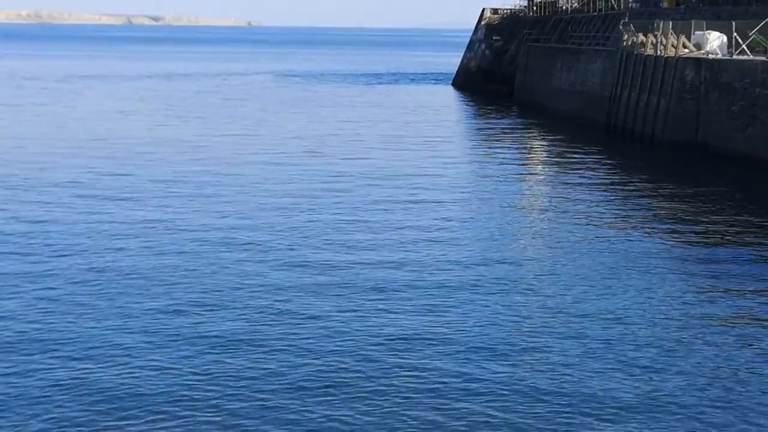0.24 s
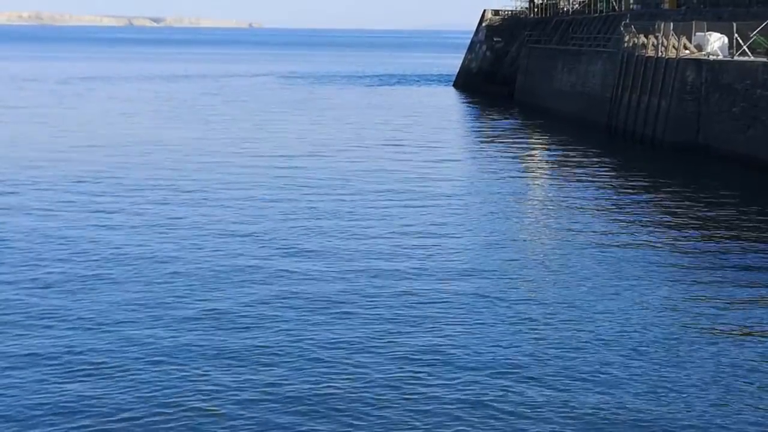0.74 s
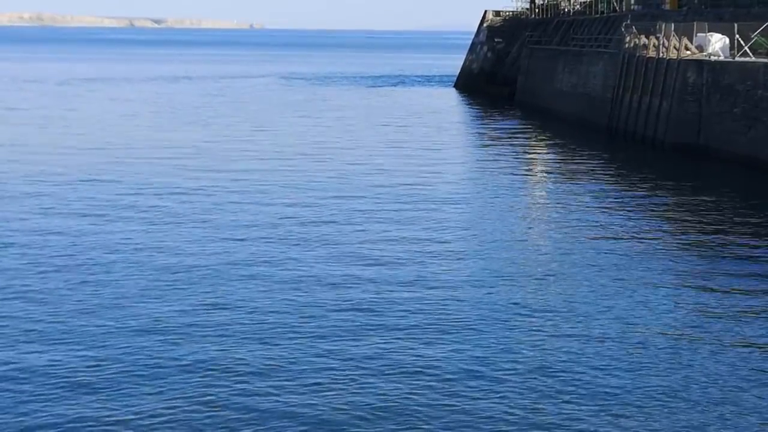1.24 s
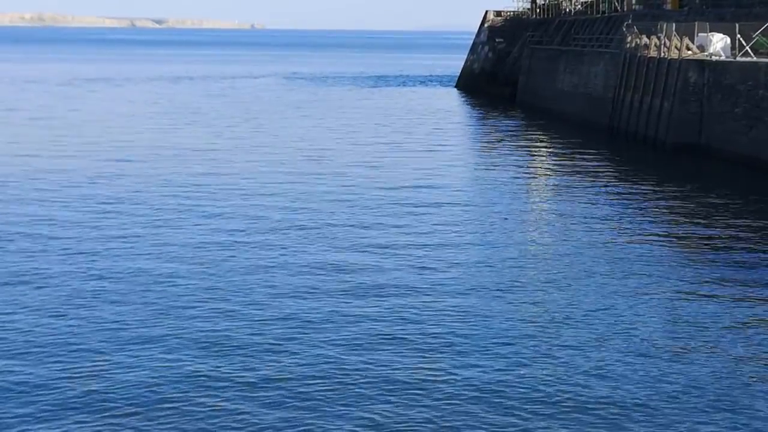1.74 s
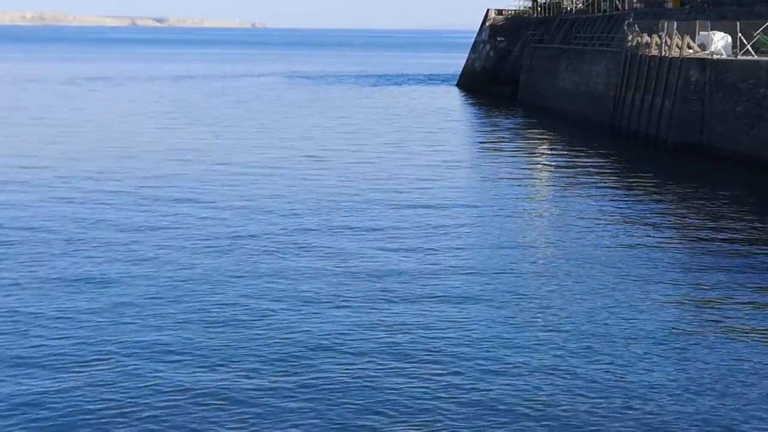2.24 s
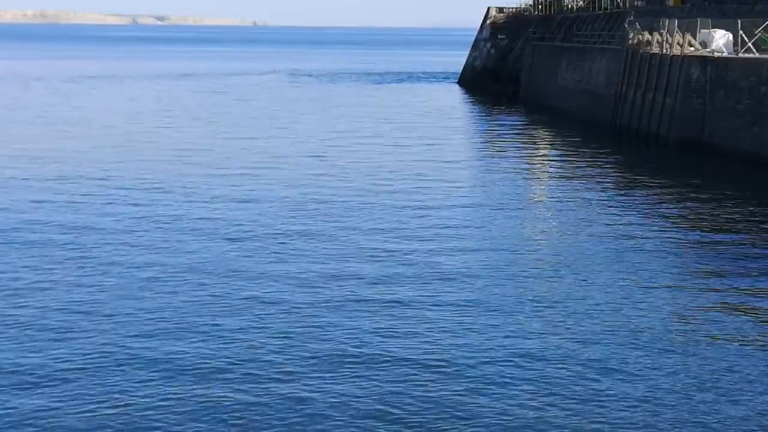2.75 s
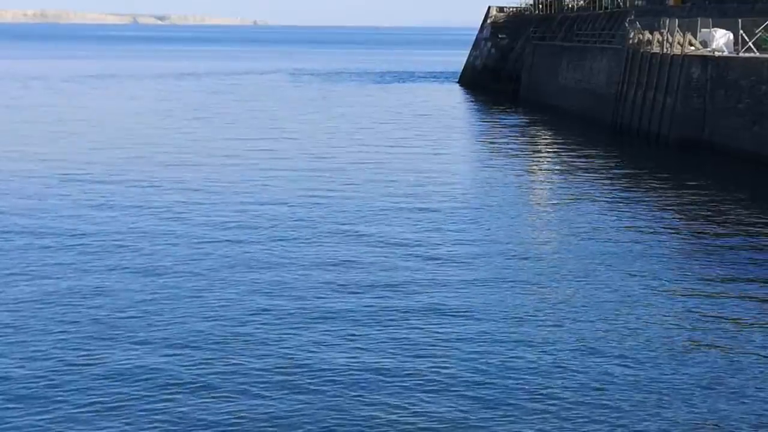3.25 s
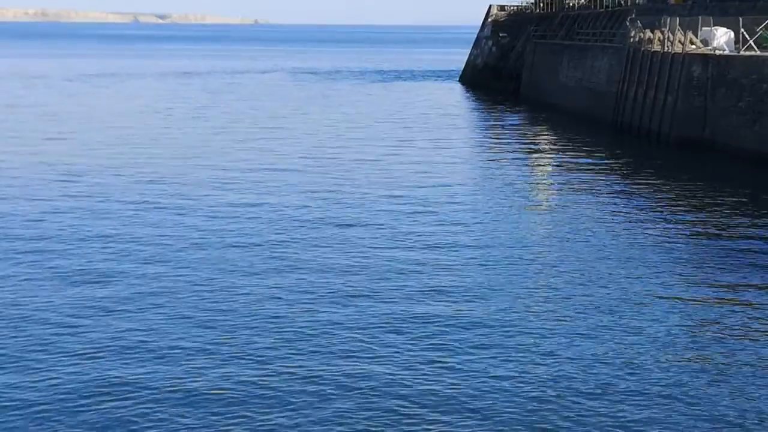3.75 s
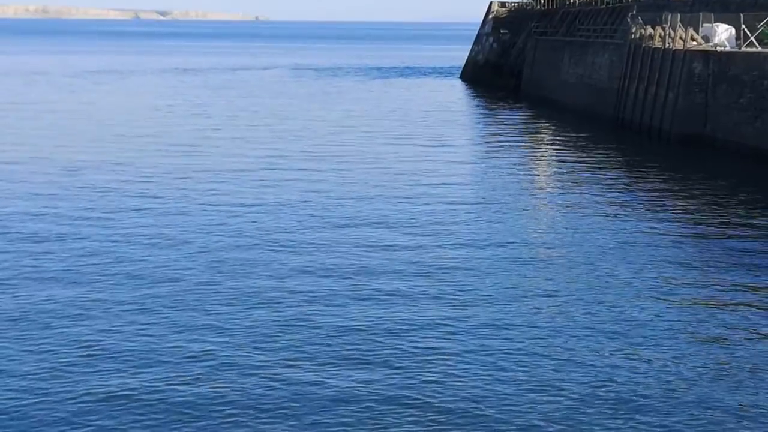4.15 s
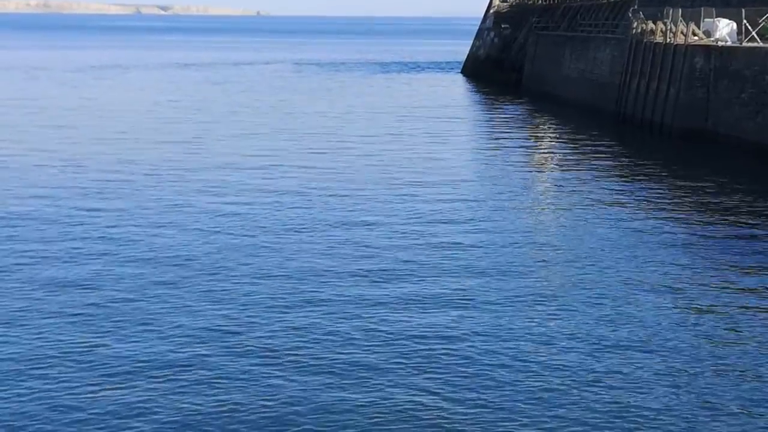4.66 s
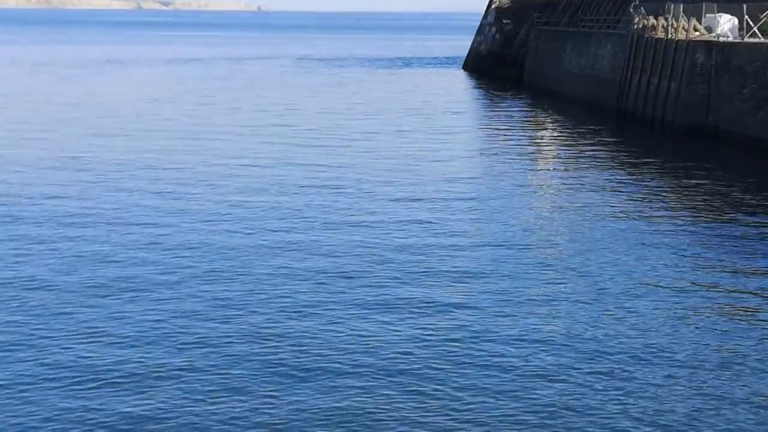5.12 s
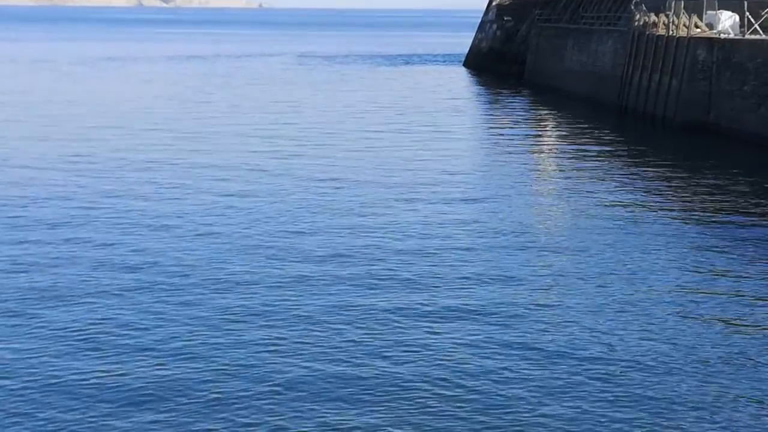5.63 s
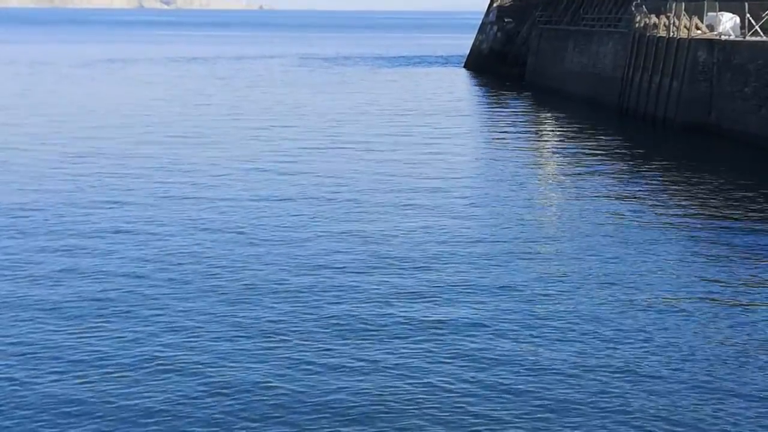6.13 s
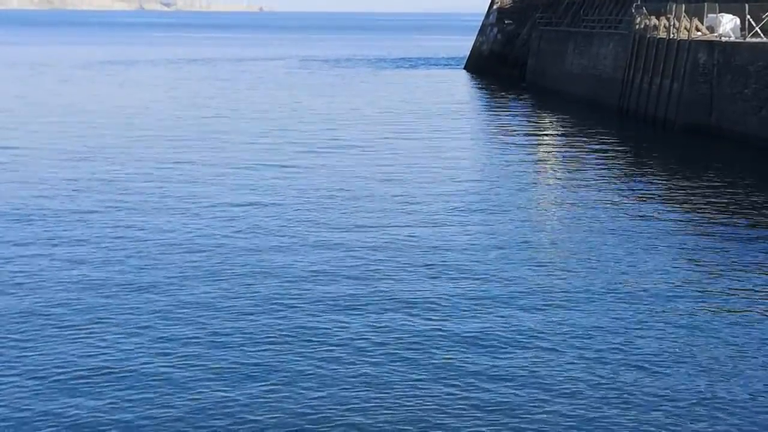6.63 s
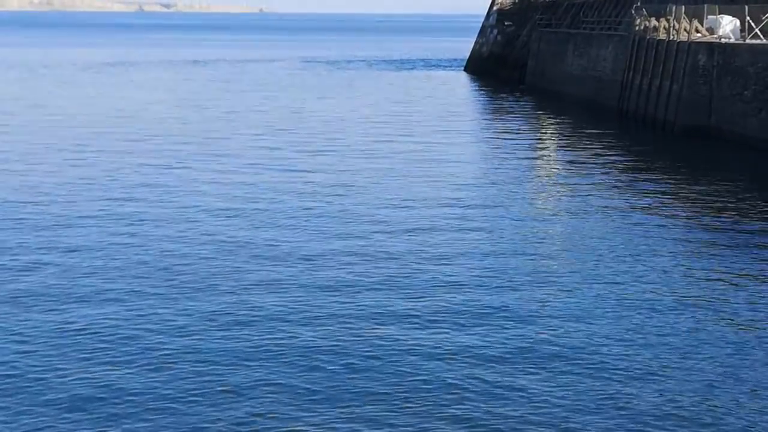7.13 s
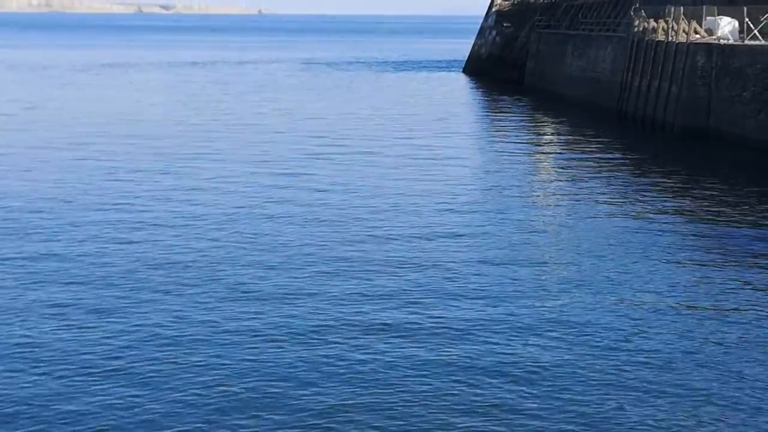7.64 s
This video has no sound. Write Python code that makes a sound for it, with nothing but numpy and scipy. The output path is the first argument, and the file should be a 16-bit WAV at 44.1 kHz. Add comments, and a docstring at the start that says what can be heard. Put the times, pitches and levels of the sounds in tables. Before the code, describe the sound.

Calm sea water laps at a stone harbour wall, with a sharp slap, hollow plops and fine foam fizz in the first second, then quiet trickling and single drops. A small bird twitters thinly around three seconds. Over a soft low breeze, wind gusts start buffeting the microphone near six seconds, thudding irregularly and growing loud while livelier wavelets splash. Open air, close stereo.

```python
"""Calm sea laps against a stone harbour wall: noise and bubble pings swell with each small wave.
Foam fizzes, single drops tick, wavelets slap the stone and large bubbles plop with a rising pitch.
Small birds twitter thinly as gliding, trilled tones that the wall throws back; far tones hum faintly.
A steady breeze of low noise rumbles on the microphone; trains of pressure dips make its gusts,
faint at first and strong near the end."""
import sys
import numpy as np
from scipy import signal
from scipy.fft import rfft, irfft
from scipy.io import wavfile
from scipy.ndimage import uniform_filter1d

SR = 44100
rng = np.random.default_rng(int(sys.argv[2]) if len(sys.argv) > 2 else 0)


def persist_wave(psi):
    """Save psi, clipped to +-1, as 16-bit WAV."""
    counts = np.round(np.clip(psi, -1, 1) * 32767).astype(np.int16)
    wavfile.write(sys.argv[1], SR, np.atleast_2d(counts).T)


N = 347772
TIME = np.arange(N) / SR


def amp(db):
    """Logarithmic level: turns decibels into an amplitude gain."""
    return 10 ** (np.asarray(db) / 20)


def evened(x):
    """Normalisation: scales to a root-mean-square of 1."""
    return x / np.sqrt(np.mean(x ** 2) + 1e-20)


def smoothed(x, size, axis=-1):
    """Low-pass smoothing: two moving averages in succession."""
    return uniform_filter1d(uniform_filter1d(x, size=size, axis=axis), size=size, axis=axis)


def read(points, hz):
    """Spectral interpolation: reads a curve along a logarithmic frequency axis."""
    f, value = np.transpose(points)
    return np.interp(np.log(hz + 1), np.log(f + 1), value)


def add(mix, start_s, sound):
    """Superposition: adds a sound to the mix from start_s on."""
    part = mix[:, round(start_s * SR):][:, :sound.shape[-1]]
    part += sound[..., :part.shape[1]]


def side_gains(pan_db):
    """Level difference: left and right gains that lie pan_db apart."""
    return amp([[pan_db / 2], [-pan_db / 2]])


def panned(sound, pan_db):
    """Equal-power panning: places a sound by level difference at constant total power."""
    return sound * evened(side_gains(pan_db))


def band_noise(size, hz, width_hz):
    """Band-limited noise: two unrelated channels under a bell-shaped spectrum."""
    f = np.fft.rfftfreq(size, 1 / SR)
    bell = np.exp(-2 * ((f - hz) / width_hz) ** 2)
    return evened(irfft(rfft(rng.standard_normal((2, size))) * bell, size))


# likeness of the two microphones; columns: frequency_hz, coherence [-1 to 1]
COHERENCE = [(40, 1), (130, 1), (290, 0.82), (640, -0.27), (1400, 0.074), (15000, -0.15)]


def paired(z, hz):
    """Spatial coherence: close microphones hear the bass alike, so mid outweighs side there."""
    same = np.clip(read(COHERENCE, hz), -1, 1)
    mid = z[0] * np.sqrt((1 + same) / 2)
    side = z[1] * np.sqrt((1 - same) / 2)
    return np.array([mid + side, mid - side])


def wall(x, t60, delay, per_s=4410, size=22050):
    """Scattered reflection: sparse random echoes off stone and water, decaying exponentially."""
    t = np.arange(size) / SR
    taps = rng.standard_normal((2, size)) * (rng.random((2, size)) < per_s / SR)
    tail = taps * amp(-60 * t / t60) * (t > delay)
    tail = tail / np.linalg.norm(tail, axis=1, keepdims=True)
    return signal.fftconvolve(x, tail, axes=1)[:, :N]


def ticks(per_s, spread_db, t60, size=500):
    """Impact noise: randomly timed broadband bursts of decaying power, as of drops on stone and water."""
    strength = amp(spread_db * np.minimum(rng.exponential(1, (2, N)), 3))
    clicks = (rng.random((2, N)) < per_s / SR) * strength
    decay = amp(-120 * np.arange(size) / SR / t60)  # of power, hence twice the 60 dB
    power = signal.oaconvolve(clicks ** 2, decay[None], axes=1)[:, :N]
    shared = power + 0.43 * power[::-1]  # each side also hears the other's drops
    return evened(np.sqrt(abs(shared)) * rng.standard_normal((2, N)))


# far hum; columns: pitch_hz, level_db
HUM = [(269, -79), (533, -101), (1077, -76.5), (1568, -81.5)]


def hum(width_hz=18):
    """Narrow-band noise: faint tones from far away, each made fuzzy by its bandwidth."""
    return sum(amp(level_db) * band_noise(N, pitch_hz, width_hz) for pitch_hz, level_db in HUM)


def eddies(colour, steadiness, crossing_s=0.00043):
    """Turbulent pressure: low, coloured noise; steadiness evens out its chance lulls."""
    hz = np.fft.rfftfreq(N, 1 / SR)
    spectrum = paired(rfft(rng.standard_normal((2, N))), hz)
    x = evened(irfft(spectrum * amp(read(colour, hz)), N))
    # eddies reach one microphone before the other, from a side that keeps changing
    drift = evened(irfft(rfft(rng.standard_normal(N)) * (hz < 6), N))
    lag = crossing_s * SR * drift
    x = np.array([x[0], np.interp(np.arange(N) + lag, np.arange(N), x[1])])
    power = smoothed((x ** 2).mean(0), size=1800)
    return evened(x / power ** (steadiness / 2))


def vortices(rate, core=0.65, uneven=.3, size_db=2, lag_turns=0.052):
    """Vortex train: cores pass at uneven intervals, each a sharp dip in pressure."""
    hz = np.fft.rfftfreq(N, 1 / SR)
    pace, strength, side = (evened(irfft(rfft(rng.standard_normal(N)) * (hz < 35), N)) for _ in range(3))
    turns = np.cumsum(rate * np.exp(uneven * pace)) / SR
    # each vortex reaches one microphone a little before the other
    turns = turns + lag_turns * side * np.array([[.5], [-.5]])
    dips = 1 / (1 + (np.sin(np.pi * turns) / core) ** 2)
    pressure = (dips.mean() - dips) * amp(size_db * strength)
    return evened(pressure - uniform_filter1d(pressure, size=3000))


# colour of the breeze; columns: frequency_hz, relative density [dB per Hz]
BREEZE = [(8.8, -44), (15, 2.5), (32, 2.5), (63, 0), (102, -5.5), (128, -14.5), (268, -16), (300, -21.5),
          (390, -39), (660, -120)]
BREEZE_DB = -52.5
# colour of the gusts' turbulence; columns: frequency_hz, relative density [dB per Hz]
BUFFET = [(10, -4.5), (25, 5), (45, 6), (65, -1), (90, -3.5), (130, -9.5), (190, -25.5), (300, -36.5),
          (600, -89), (1500, -80)]
# gusts; columns: start_s, end_s, relative level_db, typical vortex rate [per s]
GUSTS = [(0.595, 0.805, -48.5, 34), (1.02, 1.155, -52, 31), (2.737, 2.797, -52, 25.3),
         (5.806, 5.895, -44, 31.6), (6.041, 6.12, -30, 30), (6.13, 6.209, -34.5, 29),
         (6.213, 6.256, -26.5, 58), (6.261, 6.307, -32, 50), (6.365, 6.405, -29.5, 29),
         (6.471, 6.55, -36, 28.5), (6.679, 6.747, -38.5, 32.7), (6.88, 6.953, -27, 32.4),
         (6.953, 7.002, -31.5, 38.3), (7.101, 7.21, -30.5, 33), (7.219, 7.245, -32.5, 31.7),
         (7.252, 7.29, -32.5, 58), (7.312, 7.381, -33, 33), (7.384, 7.412, -27, 41),
         (7.414, 7.518, -24, 45), (7.528, 7.551, -30, 42.4), (7.568, 7.614, -26.5, 38),
         (7.701, 7.748, -25.5, 58.5), (7.765, 7.817, -28, 32.3), (7.816, 7.849, -26, 64),
         (7.861, 7.914, -24, 38)]


def wind(swirl_db=-6, edge_s=0.017, wake_db=-15):
    """Flow noise: a steady breeze, then vortices in finer turbulence, higher when they pass faster."""
    breeze = eddies(BREEZE, steadiness=0.12) * amp(BREEZE_DB)
    force = np.zeros(N)
    for start_s, end_s, level_db, _ in GUSTS:
        onset = np.tanh(2 * (TIME - start_s) / edge_s)
        release = np.tanh(2 * (TIME - end_s) / edge_s)
        force += amp(level_db) * (onset - release) / 2
    # weaker turbulence lingers around and between gusts
    wake = amp(wake_db) * abs(uniform_filter1d(force, size=13000))
    gusts = np.array(GUSTS)
    times, rates = gusts[:, :2].ravel(), np.repeat(gusts[:, 3], 2)
    rate = np.interp(TIME, np.sort(times), rates)
    swirl = eddies(BUFFET, steadiness=0.31)
    buffeting = evened(vortices(rate) + amp(swirl_db) * swirl)
    return breeze + force * buffeting + wake * swirl


# octave overtone, strong only in low notes; columns: pitch_hz, level against the note [dB]
OVERTONE = [(4700, -21), (6000, -32), (8000, -45)]
TRILL_HZ = 160.3  # mean swings of pitch per second
NOTE_RISE, NOTE_RAMP_S = 0.18, 0.0023  # share of a note over which it swells; fade at its end


def whistle(length_s, pitches, trill_hz, flutter_db=3.0, jitter=0.0057, lag_rad=1.47):
    """Frequency modulation: a thin note slurs through its pitches; a fast, uneven trill makes it buzz."""
    t = np.arange(round(length_s * SR)) / SR
    wobble, uneven = (evened(uniform_filter1d(rng.standard_normal(len(t)), size=80)) for _ in range(2))
    glide = np.interp(t, np.linspace(0, length_s, len(pitches)), pitches)
    glide = uniform_filter1d(glide, size=150, mode="nearest")
    trill = np.sin(2 * np.pi * np.cumsum(TRILL_HZ * (1 + 0.25 * uneven)) / SR)
    hz = glide * (1 + jitter * wobble) + trill_hz * trill
    # paths over the water add and cancel, differently at each microphone
    flutter = evened(smoothed(rng.standard_normal((2, len(t))), size=160))
    phase = 2 * np.pi * np.cumsum(hz) / SR + np.array([[0], [lag_rad]])
    tone = np.sin(phase) + amp(read(OVERTONE, hz)) * np.sin(2 * phase)
    tone = evened(tone * amp(flutter_db * flutter))
    swell = np.minimum(t / (NOTE_RISE * length_s), 1)
    fade = np.minimum((length_s - t) / NOTE_RAMP_S, 1)
    return tone * swell * fade


# bird notes; columns: start_s, length_s, pitch_hz at five even steps, trill depth_hz, level_db,
# left minus right_db
NOTES = [(2.94, .042, (7850, 7850, 7600, 6700, 6300), 0, -68, -4),
         (2.969, .06, (8800, 8600, 8250, 7950, 7950), 50, -67, -3.5),
         (2.997, .044, (7450, 7100, 7350, 7200, 6950), 110, -61, -3),
         (3.036, .04, (6600, 5300, 4700, 4600, 4350), 50, -55, 1),
         (3.066, .07, (5000, 4700, 4900, 4900, 4800), 600, -57, -1),
         (3.08, .022, (4200, 4000, 3900, 3800, 3750), 120, -62, 0),
         (3.137, .022, (4700, 4400, 4300, 4200, 5000), 450, -58, 0),
         (3.158, .035, (5150, 5000, 5150, 4900, 4700), 500, -53.5, 0),
         (3.163, .012, (7900, 7950, 8100, 8450, 8800), 0, -62, -3),
         (3.167, .099, (8900, 8500, 8150, 7800, 7850), 25, -56, -2),
         (3.256, .078, (7950, 7950, 8300, 8050, 7650), 25, -55.5, -5),
         (3.337, .041, (6100, 4800, 4600, 4350, 3950), 20, -55, 4),
         (3.46, .06, (8650, 8600, 8250, 8150, 7850), 160, -68.5, -2),
         (3.535, .015, (6800, 7000, 6980, 6800, 6400), 0, -48, -7),
         (3.548, .026, (6400, 6400, 6400, 6500, 6550), 60, -53.5, -3),
         (3.547, .066, (7850, 7820, 7750, 7580, 7580), 140, -59, -5),
         (3.572, .008, (4100, 4250, 4500, 4750, 5000), 0, -60, -4),
         (3.593, .011, (3500, 3650, 3650, 3550, 3300), 0, -57, -6),
         (3.618, .02, (3500, 3650, 4000, 4300, 4550), 150, -60.5, -4),
         (3.638, .009, (4900, 4800, 4600, 4300, 4100), 0, -60, -6),
         (3.654, .018, (4200, 4450, 4400, 4200, 3900), 250, -61, -8),
         (3.68, .018, (4100, 4500, 4850, 4800, 4500), 250, -61.5, 1),
         (3.71, .008, (5900, 5750, 5500, 4700, 4300), 0, -55, 6),
         (3.746, .024, (5000, 4700, 4000, 3400, 3400), 300, -61, -1),
         (3.769, .01, (4500, 4600, 4650, 4600, 4400), 0, -60, -2),
         (3.913, .02, (8600, 8800, 8950, 9000, 8900), 100, -66, -1),
         (3.933, .048, (8800, 8450, 8250, 8150, 8250), 130, -60, -1),
         (6.789, .026, (9350, 9450, 9350, 9150, 9050), 0, -59, 14),
         (6.81, .052, (9050, 8820, 9000, 8780, 8450), 30, -45.5, 15),
         (7.185, .033, (8620, 8280, 8140, 8030, 7940), 0, -62, .5)]


def birds(echo_db=-5, echo_fade_db=-5):
    """Direct sound and echo: the wall returns each note nearer the middle, high notes more weakly."""
    direct, thrown = np.zeros((2, 2, N))
    for start_s, length_s, pitches, trill_hz, level_db, pan_db in NOTES:
        call = amp(level_db) * whistle(length_s, pitches, trill_hz)
        octaves = np.log2(np.mean(pitches) / 6000)
        add(direct, start_s, panned(call, pan_db))
        add(thrown, start_s, amp(echo_fade_db * octaves) * panned(call, pan_db / 2))
    return direct + amp(echo_db) * wall(thrown, t60=0.26, delay=.006, per_s=150)


# colour of the foam; columns: frequency_hz, relative density [dB per Hz]
FIZZ = [(3500, -28), (4600, -4), (5500, 6), (6400, -25), (9000, -3), (11000, -14), (15000, -21)]
# foam fizzing after the first waves; columns: start_s, length_s, level_db at its height
FOAM = [(.58, 0.19, -57.5), (0.815, 0.18, -62), (0.99, 0.15, -60)]


def foam():
    """Bubble bursting: many tiny impulses fuse into a fine crackle that swells and dies away."""
    level = np.zeros((2, N))
    for start_s, length_s, level_db in FOAM:
        add(level, start_s, amp(level_db) * np.sin(np.linspace(0, np.pi, round(length_s * SR))))
    crackle = rfft(ticks(per_s=570, spread_db=6, t60=0.007))
    colour = amp(read(FIZZ, np.fft.rfftfreq(N, 1 / SR)))
    return level * evened(irfft(crackle * colour, N))


# single drops landing on the stone; columns: start_s, initial level_db, centre_hz
DRIPS = [(.16, -58, 7700), (.388, -67, 11000), (.455, -59, 7160), (1.706, -55, 7350), (2.699, -59, 5500),
         (3.128, -52, 5860), (3.241, -55, 7500), (3.467, -70, 11000), (3.818, -58, 4800),
         (3.894, -57, 9500), (4.37, -56, 5330), (4.805, -61, 9500), (5.892, -64, 10500), (6.419, -46, 8500),
         (6.51, -62, 10500), (6.984, -46.5, 6966), (7.613, -63, 9500)]


def drips(t60=0.018, breadth=0.35, spatter_db=-6, size=2000):
    """Impact: single drops tick, short and bright; scattered reflections soften them."""
    out, t = np.zeros((2, N)), np.arange(size) / SR
    for start_s, level_db, centre_hz in DRIPS:
        tick = band_noise(size, centre_hz, breadth * centre_hz)[0]
        add(out, start_s, tick * amp(level_db - 60 * t / t60))
    return out + amp(spatter_db) * wall(out, t60=0.088, delay=.002)


# large bubbles; columns: start_s, level_db, starting pitch_hz, ring time t60_s
PLOPS = [(0.583, -40, 314, 0.053), (.612, -43.5, 353, 0.079), (.7, -39.5, 390, 0.048),
         (1.003, -51.5, 216, 0.17), (1.06, -54, 686, 0.16), (1.26, -43, 201, 0.092),
         (1.245, -55, 475, 0.11), (0.651, -47.5, 163, 0.22), (1.09, -52, 160, 0.13),
         (1.471, -51, 274, 0.21), (1.555, -49, 220, 0.11), (1.628, -56, 446, 0.28), (2.115, -49, 267, 0.12),
         (2.655, -53, 627, 0.078), (3.084, -50, 278, 0.17), (3.138, -47, 260, 0.3), (3.19, -47, 206, 0.15),
         (3.275, -50, 854, 0.054), (3.29, -53, 421, 0.14), (4.53, -46.5, 640, 0.051),
         (5.086, -53, 315, 0.13)]


def plops(rise=0.105):
    """Bubble resonance: large bubbles ring and rise in pitch as they near the surface."""
    out = np.zeros((2, N))
    for start_s, level_db, pitch_hz, t60 in PLOPS:
        t = np.arange(0, t60, 1 / SR)
        envelope = amp(level_db - 60 * t / t60) * (1 - np.exp(-t / 0.003))
        # the phase bends upward: the pitch climbs by twice the rise
        add(out, start_s, envelope * np.sin(2 * np.pi * pitch_hz * t * (1 + rise * t / t60)))
    return out + amp(-10.0) * wall(out, t60=0.21, delay=0.0089)


# slaps on the stone; columns: start_s, level_db, centre_hz, crack time t60_s, left minus right_db
SLAPS = [(.132, -46, 1250, .014, 2), (.164, -55, 1500, .03, 1), (.578, -43, 2400, .03, 4),
         (.609, -46, 2450, .07, 4), (.629, -45, 2450, .08, 1), (.7025, -41, 600, .012, 0),
         (.7044, -28.5, 2620, .008, 1.5), (.717, -46, 2500, .03, -2.5), (.856, -49, 2400, .02, 1),
         (1.009, -47, 2050, .04, 1.5), (1.468, -52, 1890, .03, -1.5), (1.488, -53, 3500, .035, 0),
         (1.871, -48, 2100, .02, 0), (1.897, -54.5, 2970, .035, 0), (4.044, -46, 2520, .012, -3),
         (4.771, -53, 1880, .017, 0), (4.908, -48.5, 2200, .017, 1.5), (5.237, -53, 2030, .017, 0),
         (4.84, -51, 2300, .025, 0), (6.222, -47, 2050, .03, 0), (6.292, -43, 1850, .03, 2),
         (6.559, -46, 2400, .025, 1), (6.587, -47, 2000, .02, -2.5), (7.261, -45, 2240, .035, -.5)]


def slaps(spatter_t60=0.22, spatter_db=-15, breadth=0.24, size=6000):
    """Trapped-air impact: a wavelet cracks on stone around the pitch of its air, then spatters a little."""
    out, t = np.zeros((2, N)), np.arange(size) / SR
    attack = 1 - np.exp(-t / .0003)
    for start_s, level_db, centre_hz, crack_t60, pan_db in SLAPS:
        width_hz = breadth * min(centre_hz, 3500)
        # the crack comes straight to both microphones, with its chance swells flattened
        crack_phase = np.angle(signal.hilbert(band_noise(size, centre_hz, width_hz)[0]))
        crack = np.sqrt(2) * np.cos(crack_phase) * amp(-60 * t / crack_t60)
        # the spatter comes from all around
        spatter = band_noise(size, centre_hz, width_hz) * amp(spatter_db - 60 * t / spatter_t60)
        add(out, start_s, attack * (crack + spatter) * amp(level_db) * side_gains(pan_db))
    return out


# waves reaching the wall; columns: crest_s, relative level_db, build-up_s, drain time t60_s,
# extra slosh_db, extra spray_db
LAPS = [(0.18, -56, 0.12, 1, -7, -4), (0.42, -58.5, 0.037, 1.25, -7, -4), (0.63, -50, 0.076, 3.1, 2, -1.5),
        (0.73, -56, 0.17, 0.29, 4.5, 6.5), (0.89, -48.5, 0.063, 0.98, -3.5, 1.5),
        (1.07, -50, 0.074, 1.72, 4.5, -3), (1.59, -55.5, 0.2, 2, 3.5, -1.5), (1.9, -58.5, 0.018, 1, 2, -3),
        (3.11, -58.5, 0.073, 1.7, 0, 1), (3.64, -60.5, 0.48, 0.57, -2, 1), (4.41, -69.5, 1, 1.9, 9, 6),
        (4.79, -60, 0.72, 0.49, 0, -1.5), (4.91, -53, 0.16, 0.67, 0.5, 0), (5.26, -55.5, 0.41, 2.2, 2, 0.5),
        (5.62, -61, 0.69, 1.9, 3, -2.5), (6.31, -49.5, 0.2, 0.5, 1.5, 0.5), (6.4, -48, 0.11, 0.91, 4, 3.5),
        (6.579, -50, 0.042, 0.4, -10, 4), (6.89, -51, 0.98, 2.17, 3.5, 1.5),
        (7.27, -52.5, 0.19, 1.4, 0.5, 1), (7.62, -50, 0.44, 1.03, 0, 1.5), (7.82, -49.5, 0.1, 3.1, 0, -2)]
BACKWASH_DB, BACKWASH_T60_S = -10, 2.4  # every wave leaves a weak, slow trickle


def surges(t):
    """Energy envelope: slosh, splash and spray power builds, breaks, drains and leaves a trickle."""
    power = np.zeros((3, len(t)))
    for crest_s, level_db, build_s, t60, slosh_db, spray_db in LAPS:
        before, after = np.maximum(crest_s - t, 0), np.maximum(t - crest_s, 0)
        build = np.exp(-2 * (before / build_s) ** 2)
        backwash = amp(BACKWASH_DB - 60 * after / BACKWASH_T60_S) ** 2
        drain = amp(-60 * after / t60) ** 2 + backwash
        heights = amp([level_db + slosh_db, level_db, level_db + spray_db]) ** 2
        power += np.outer(heights, build * drain)
    return power


# hollow in the wall; columns: pitch_hz, width_hz, level_db against the wave
HOLLOW = (2524, 190, -11.5)


def hollow():
    """Cavity resonance: the splash of each wave rings one narrow band of the wall."""
    pitch_hz, width_hz, level_db = HOLLOW
    t = TIME[::256]
    splash = np.sqrt(np.interp(TIME, t, surges(t)[1]))
    return amp(level_db) * splash * band_noise(N, pitch_hz, width_hz)


def droplets(per_s, cycles, spread_db, count=36):
    """Bubble pings: tiny bubbles ring with rising pitch, even over frequency, small ones most numerous."""
    out = np.zeros((2, N))
    for hz in np.geomspace(300, 13000, count):
        life = cycles / hz
        t = np.arange(0, 5 * life, 1 / SR)
        envelope = np.exp(-t / life) * (1 - np.exp(-hz * t))
        ping = np.sin(2 * np.pi * hz * t * (1 + 0.015 * t / life)) * envelope
        born = rng.random((2, N)) < per_s * np.sqrt(hz / 1000) / SR
        births = born.sum()
        strength = amp(spread_db * np.minimum(rng.exponential(1, births), 4))
        clicks = np.zeros((2, N))
        clicks[born] = strength * rng.choice([-1, 1], births)
        out += np.sqrt(hz) * evened(signal.oaconvolve(clicks, ping[None], axes=1)[:, :N])
    return evened(out)


# colour of the water; columns: frequency_hz, relative density [dB per Hz]
WATER = [(150, 0.5), (275, -3.5), (370, -10), (820, -9.5), (1060, 3.5), (1290, 2.5), (1750, 7.5),
         (2650, 5.5), (3100, -7), (4200, -15.5), (5050, -12), (5650, -13), (6250, -22), (7800, -16),
         (10300, -30.5), (15000, -36)]
# where the water is heard; columns: frequency_hz, left minus right_db
LEAN = [(300, -0.5), (700, -2.5), (1290, -2.5), (2300, 4.5), (3100, -2), (4100, -2), (5100, -7),
        (6500, -1.5), (7800, -5.5), (9000, -1), (11000, -6.5), (15000, 2.5)]
CALM_SLOSH_DB, CALM_SPLASH_DB, CALM_SPRAY_DB = -67, -63.5, -68  # ripples between the waves


def lapping(drops_db=-2, ticks_db=-5, patchy_db=1.19, flicker_db=0.87,
            slosh_db=-10, splash_db=-3.0, spray_db=-5):
    """Time-varying filtering: bubbles, drops and wash swell as low slosh, splash above, spray on top."""
    drops = droplets(per_s=60, cycles=3.06, spread_db=3.5)
    drops = evened(drops + amp(-6.0) * wall(drops, t60=0.23, delay=0.0017))
    grain = amp(drops_db) * drops + amp(ticks_db) * ticks(per_s=110, spread_db=3.0, t60=0.022)
    wash = rng.standard_normal((2, N))
    hz, t, z = signal.stft(evened(wash + grain), SR, nperseg=512, noverlap=384)
    colour = amp(read(WATER, hz))
    levels = [(CALM_SLOSH_DB, slosh_db), (CALM_SPLASH_DB, splash_db), (CALM_SPRAY_DB, spray_db)]
    bands = [(330, 1000), (1000, 3000), (3000, 9000)]  # Hz
    field_db = 0
    for surge, (calm_db, wave_db), (lo, hi), weights in zip(surges(t), levels, bands, np.eye(3)):
        low, middle, high = weights
        # neighbouring bands cross-fade over frequency
        share = read([(750, low), (1200, middle), (2700, middle), (3600, high)], hz)
        power = amp(calm_db) ** 2 + amp(wave_db) ** 2 * surge
        own_power = np.mean(colour ** 2 * (hz > lo) * (hz < hi))
        field_db = field_db + np.outer(share, 10 * np.log10(power / own_power))
    # bubbles come in clumps, in time and in size
    patches = uniform_filter1d(rng.standard_normal(field_db.shape), size=9, axis=0)
    patches = evened(uniform_filter1d(patches, size=10, axis=1))
    flicker = evened(uniform_filter1d(rng.standard_normal(len(t)), size=5))
    gain = amp(field_db + patchy_db * patches + flicker_db * flicker)
    z = paired(z, hz[:, None]) * colour[:, None] * gain
    lean_db = read(LEAN, hz)[:, None] / 2
    return signal.istft(z * amp([lean_db, -lean_db]), SR, nperseg=512, noverlap=384)[1][:, :N]


def scene():
    """Superposition: hum, wind on the microphone, birds and water add linearly."""
    water = foam() + drips() + plops() + slaps() + hollow() + lapping()
    return hum() + wind() + birds() + water


def record(dry, hiss_db=-81, edge_hz=15300):
    """Noise floor and bandwidth: a trace of microphone hiss, then a low-pass limit."""
    heard = dry + amp(hiss_db) * rng.standard_normal(dry.shape)
    low_pass = signal.firwin(511, edge_hz, window=("kaiser", 9), fs=SR)
    return signal.oaconvolve(heard, low_pass[None], "same")


dry = scene()
out = record(dry)
persist_wave(out)
```